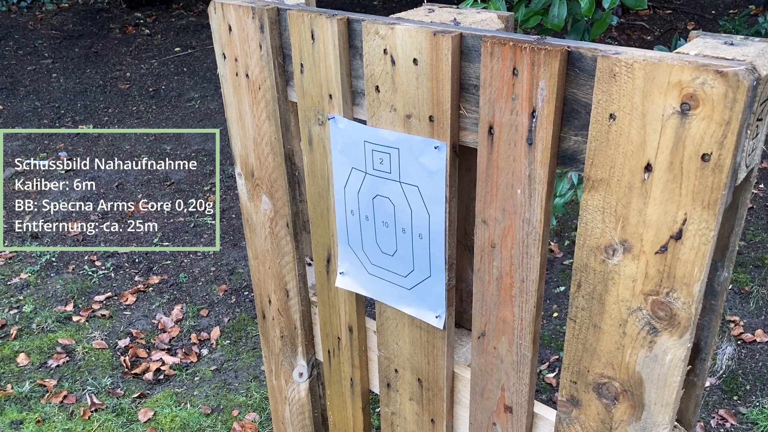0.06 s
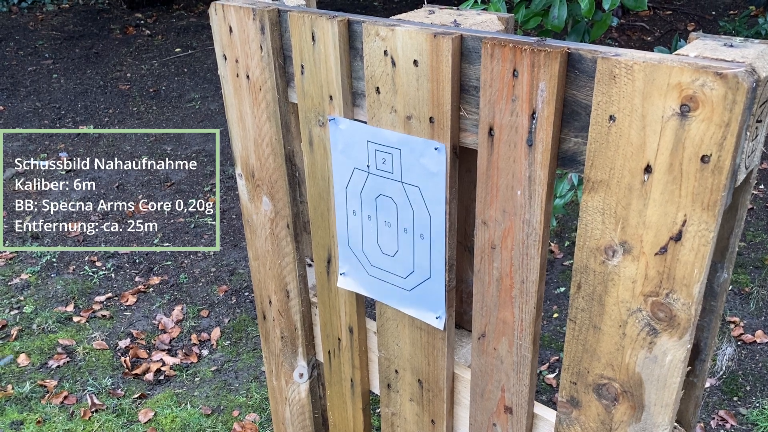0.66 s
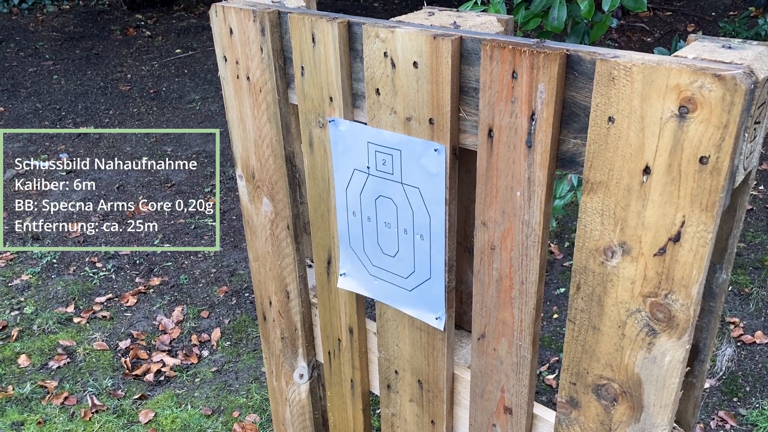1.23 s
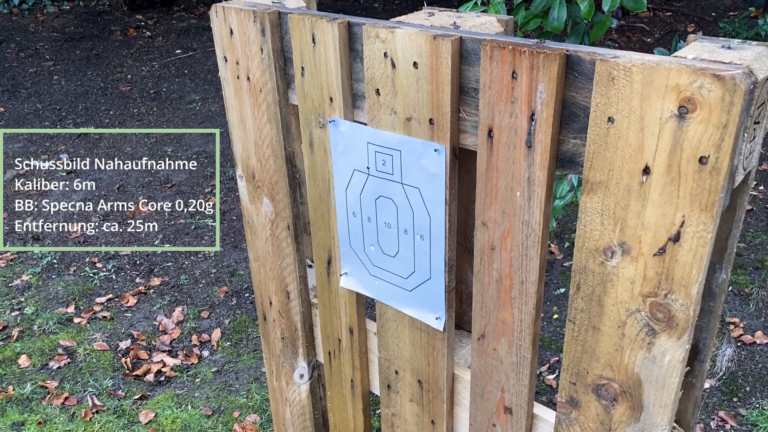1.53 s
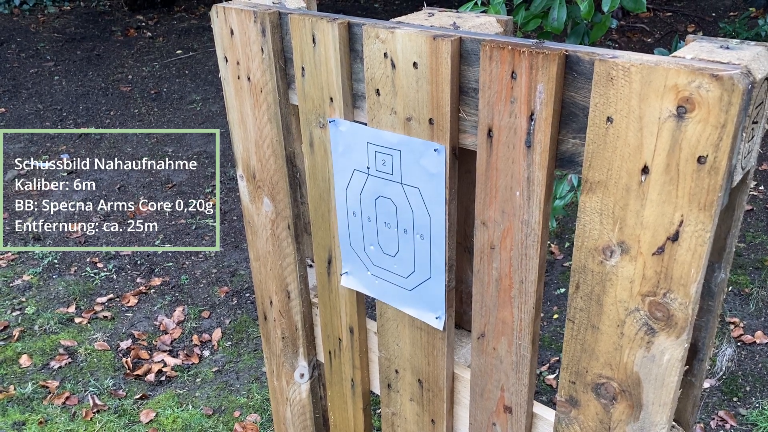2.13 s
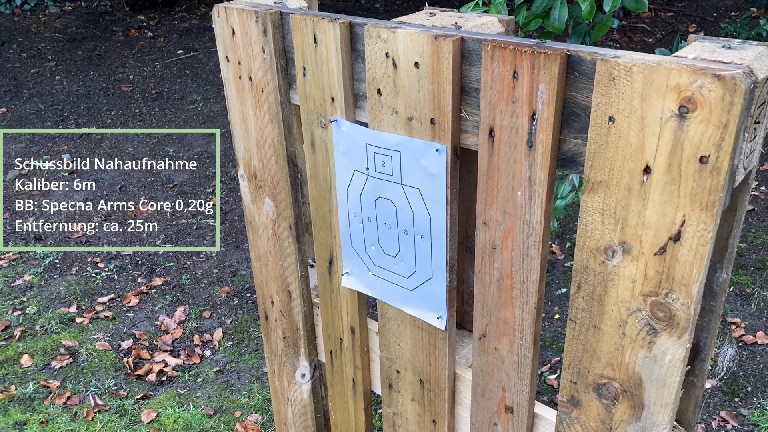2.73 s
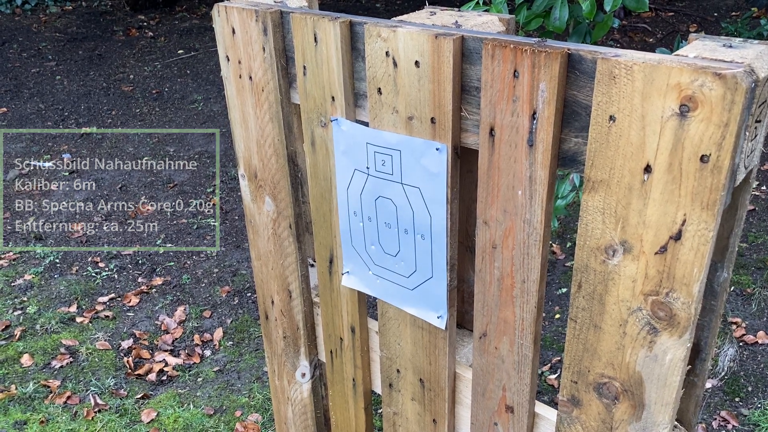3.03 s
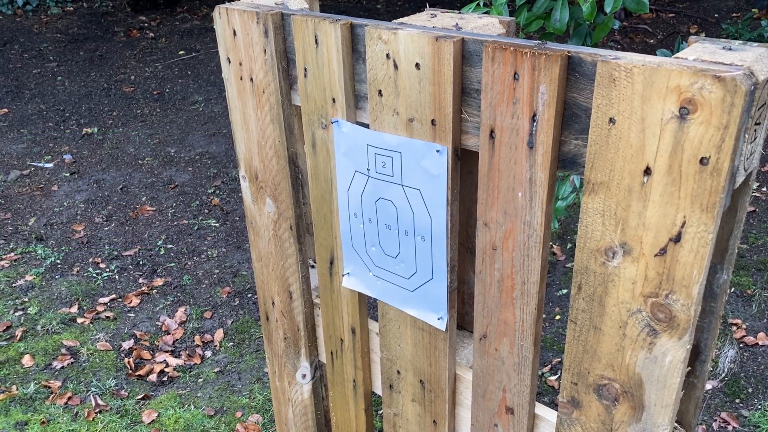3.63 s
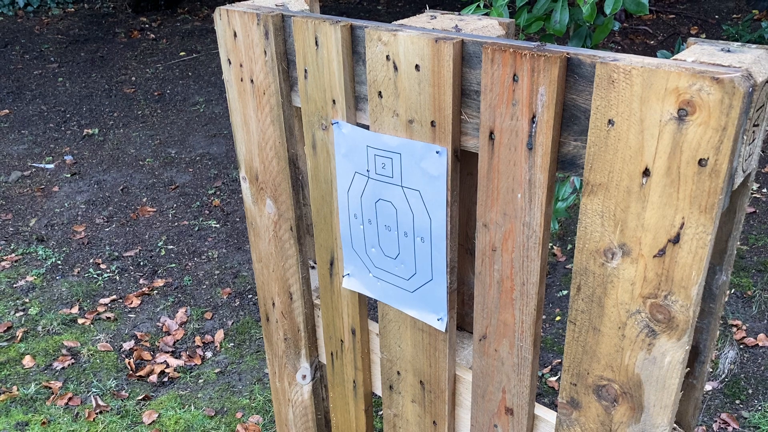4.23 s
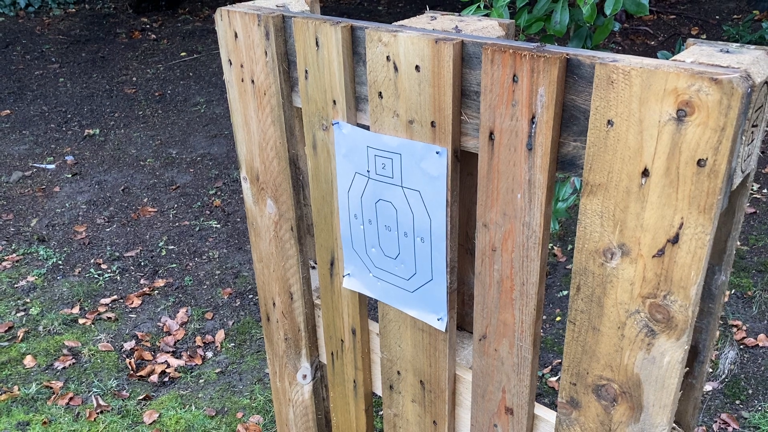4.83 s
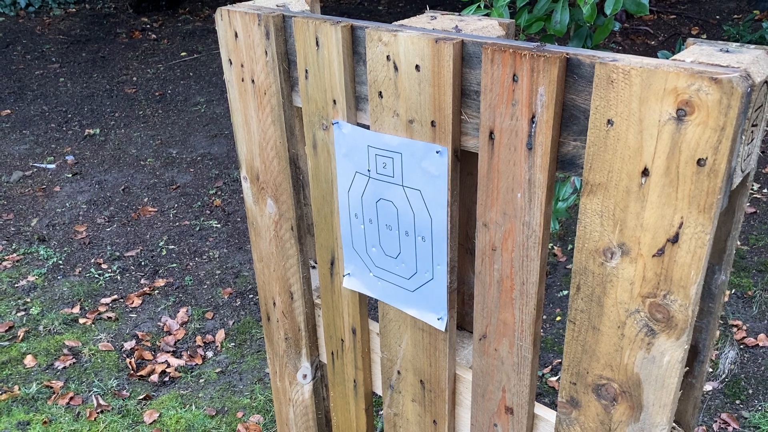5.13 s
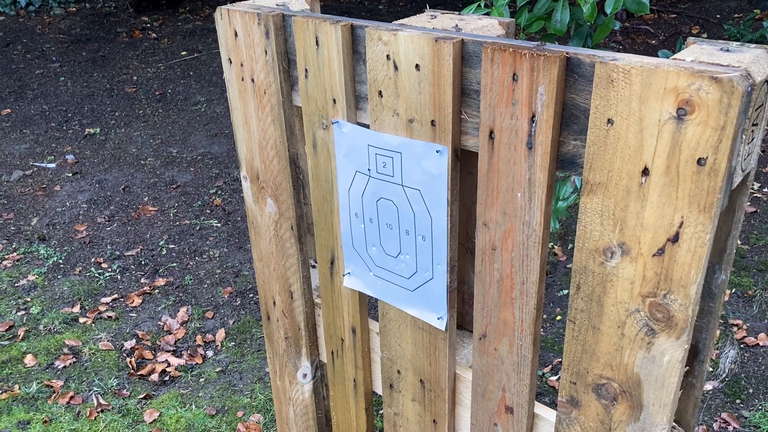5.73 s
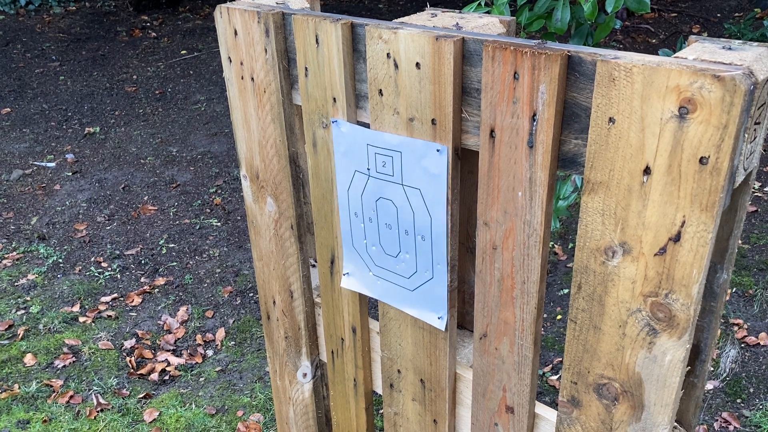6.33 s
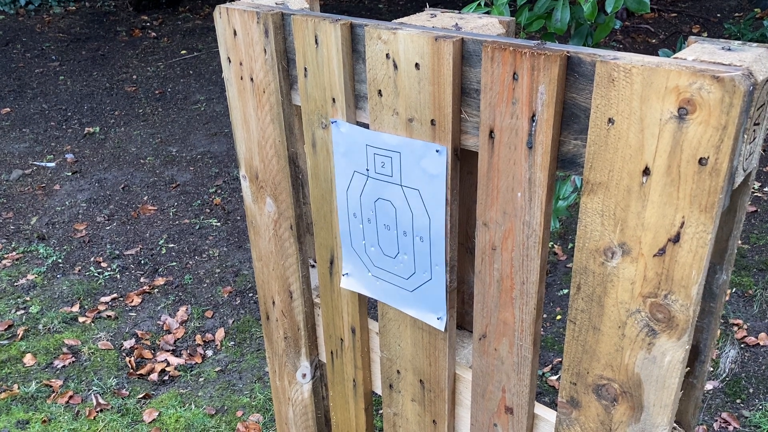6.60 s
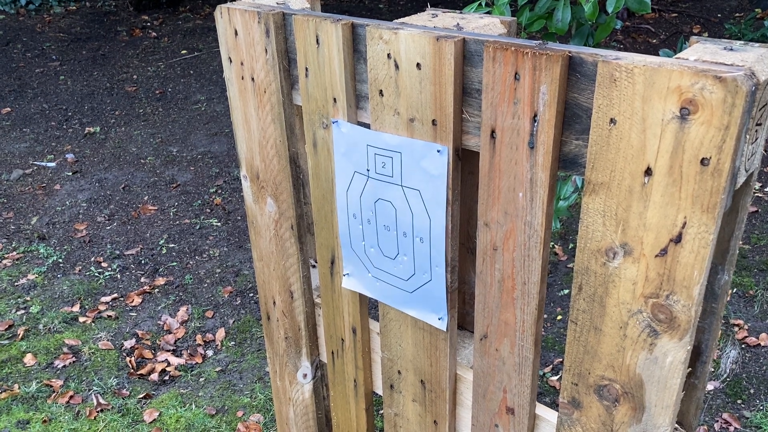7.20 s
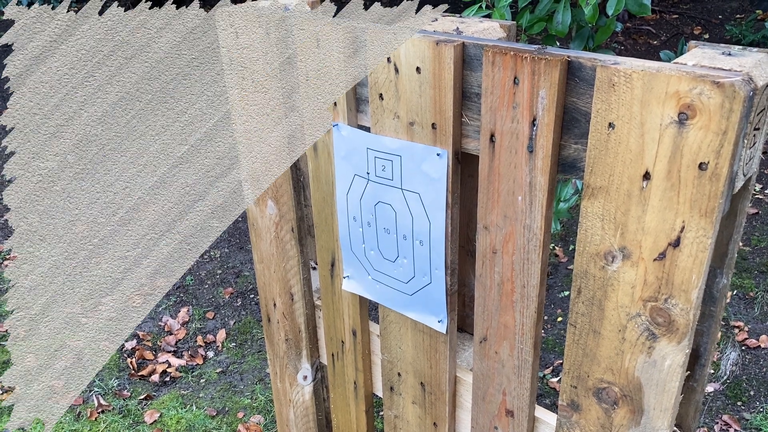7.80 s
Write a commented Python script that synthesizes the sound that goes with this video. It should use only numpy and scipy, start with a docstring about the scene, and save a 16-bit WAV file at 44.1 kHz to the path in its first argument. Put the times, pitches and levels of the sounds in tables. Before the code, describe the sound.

In a garden, the microphone stands beside a paper target on a wooden pallet while an airsoft rifle fires from a distance. Thirteen quick single pellets whizz in and crack through the paper, making the sheet flap and the boards knock, with faint pops from the rifle. After a pause, two short automatic bursts hit the target. A last faint burst misses and rustles into leaves. A low outdoor hum lies underneath.

```python
"""A garden, microphone beside a paper target on a wooden pallet, an electric airsoft rifle 25 m away.
Over a low outdoor hum come thirteen single shots. Each faint report is followed by its pellet, which
whizzes in, cracks through the paper, makes the sheet flap and the boards ring; the garden echoes and
hard hits overload the microphone. A spent pellet ticks on the wood. After a pause two full-auto
bursts strike the target, and a last one misses and rustles into the leaves."""
import sys
import numpy as np
from scipy import signal
from scipy.fft import rfft, irfft
from scipy.io import wavfile
from scipy.ndimage import uniform_filter1d

SR = 44100
rng = np.random.default_rng(int(sys.argv[2]) if len(sys.argv) > 2 else 0)


def file_out(sig):
    """Save sig as 16-bit WAV at sys.argv[1]."""
    # one column per channel
    cols = np.atleast_2d(sig).T
    # limit, then scale
    lim = np.clip(cols, -1, 1)
    pcm = np.round(lim * 32767).astype(np.int16)
    wavfile.write(sys.argv[1], SR, pcm)


N = 355446
T = np.arange(SR * 2 // 3) / SR  # seconds since an event
TEN_MS = SR // 100
PELLET_LAG_S = 0.39  # slower than sound, the pellet arrives this long after its report

# Hits on the target. The spot struck shares out the blow: dullness, thud, ring and flap add to strength.
# start_s, strength_db, dullness_db, thud_db, ring_db, ring_hz, flap_db, flight_db
HITS = [(0.381, -5, -5, -25.5, -10, 997.5, -12.5, -27.5), (0.6503, -12, -1.5, 3, -10, 813, -14, -30.5),
        (0.8723, -9, -7, -1.5, -13, 855, -10, -22.5), (1.0802, -14.5, -9, -15, -18.5, 1101, -8.5, -15.5),
        (1.28, -14.5, -0.5, -4.5, -11.5, 1066, -1.5, -26),
        (1.4858, -13.5, 2, -2.5, -13.5, 1038, -13.5, -26.5),
        (1.6837, -10, -8.5, -17, -18.5, 1430, -38, -28), (1.8855, -11, -6, -16.5, -14, 1357, -27.5, -42.5),
        (2.0978, -12.5, 5, -4, -15, 1540, -32, -35), (2.318, -11.5, 4.5, -3.5, -19, 1459, -34, -33),
        (2.5182, -10, -15, -16.5, -20.5, 1093, -30.5, -34),
        (2.707, -15.5, -0.5, -19, -4.5, 967, -30, -33.5), (2.8778, -10.5, -6, -25.5, -8, 679, -41.5, -32.5),
        (5.0107, -9, -5.5, -21.5, -16.5, 1366, -26.5, -28.5),
        (5.1079, -6.5, -9, -26, -17.5, 1366, -17, -39.5), (5.2033, -7.5, -13, -20, -13.5, 1350, -30, -39.5),
        (5.295, -10, -5, -34, -6, 818, -53, -43.5), (5.3864, -10, -5, -27, -19, 1050, -11, -30.5),
        (5.7688, -10.5, -5.5, -19.5, -24, 1077, -18.5, -29), (5.8671, -15.5, 7, -6, -17, 1532, -31, -37.5),
        (5.96, -12.5, -6, -20, -16.5, 1071, -37, -31.5), (6.0528, -13.5, 2.5, -5.5, -10.5, 814, -31.5, -33),
        (6.1483, -12, -1.5, -7, -14.5, 805, -46, -31), (6.2405, -15.5, -4.5, -20.5, -12.5, 1066, -45, -50)]
# Spectrum of rustling leaves: frequency_hz, level_db
LEAVES = [(500, -15.5), (2000, -4), (5000, 3.5), (10000, -8), (15000, -21)]


def undb(db):
    """Decibels to gain."""
    return 10 ** (np.asarray(db) / 20)


def level(x, db):
    """Give a burst the energy of 10 ms at this level."""
    return x * undb(db) / np.sqrt(np.mean(x ** 2) * x.shape[-1] / TEN_MS)


def fade(t60, delay=0):
    """Exponential decay that starts after a delay."""
    return (T >= delay) * np.exp(-np.log(1000) * np.abs(T - delay) / t60)


def bump(hz, centre_hz, octaves):
    """Bell curve on a log-frequency axis."""
    return np.exp(-.5 * (np.log2(hz / centre_hz) / octaves) ** 2)


def noise(spectrum, spread, gain=lambda hz: 1, size=len(T), wide_hz=1, bass_share=0.25):
    """Stereo noise of rms 1 from (frequency_hz, level_db); spread is side over mid, less below wide_hz."""
    hz = np.maximum(np.fft.rfftfreq(size, 1 / SR), 1)
    f, db = np.transpose(spectrum)
    colour = undb(np.interp(np.log(hz), np.log(f), db))
    mid, side = rfft(rng.standard_normal((2, size))) * gain(hz) * colour
    side = side * spread * np.minimum(bass_share + hz / wide_hz, 1)
    x = irfft(np.array([mid + side, mid - side]), size)
    return x / x.std()


def add(out, start_s, x):
    """Mix a sound in at a time."""
    i = max(int(start_s * SR), 0)
    out[:, i:i + x.shape[-1]] += x[..., :N - i]


def outdoors():
    """The garden's bed: a dull, distant, slightly restless hum."""
    # Spectrum of the hum: frequency_hz, level_db
    spectrum = [(15, -41.5), (25, -14.5), (59, -2.5), (96, -4.5), (124, -13.5), (197, -13.5), (367, -23.5),
                (475, -18.5), (584, -20.5), (631, -10.5), (682, -19.5), (1600, -19), (2820, -36),
                (5820, -37), (12000, -56), (15600, -87), (22000, -120)]
    # Its slow drift: time_s, level_db
    drift = [(0, -46.5), (1.2, -56), (3.5, -59.5), (4.1, -58), (4.4, -55.5), (6.9, -59.5), (7.3, -60.5),
             (8.05, -61.5)]
    t = np.arange(N) / SR
    restless_db = 1.1 * np.interp(t, np.linspace(0, t[-1], 60), rng.standard_normal(60))
    drift_db = np.interp(t, *np.transpose(drift))
    return noise(spectrum, 1.0, size=N, wide_hz=1200) * undb(drift_db + restless_db)


def patchy(step=SR // 400):
    """Scattered sound comes back in clumps, one from each trunk or bush."""
    return undb(2.5 * np.interp(T, T[::step], rng.standard_normal(len(T[::step]))))


def bushes(db, dullness_db, delay_s=0.14, width_s=0.043, size=SR // 3):
    """Bushes further off return a soft, late swell in the colour of the blow."""
    centre_hz = 2700 * 2 ** (-0.17 * dullness_db)
    swell = patchy() * np.exp(-((T - delay_s) / width_s) ** 2)
    return undb(db) * noise(LEAVES, 1.0, lambda f: .1 + bump(f, centre_hz, .5), size=size) * swell[:size]


def garden(db, dullness_db, near_t60=.2, far_t60=1.0, far_db=-19, wall_db=-18, wall_s=0.081):
    """Hedges and trees scatter a blow back as a hiss that dulls as it fades; a wall adds a faint slap."""
    # Spectrum of the nearby scatter: frequency_hz, level_db
    near_spectrum = [(100, -5.5), (300, -5.5), (800, -1), (1600, -1.5), (3000, 2), (6000, 2), (10000, 1),
                     (15000, -9)]
    far_spectrum = [(200, -5.5), (1000, -0.5), (2200, 1.0), (6000, -4.5), (10000, -11.5), (15000, -21)]
    blow_colour = lambda f: undb(1.2 * (dullness_db + 2.5) * bump(f, 1900, 0.88))
    near = noise(near_spectrum, 0.23, blow_colour) * fade(near_t60)
    far = noise(far_spectrum, 1.0) * fade(far_t60)
    scatter = (near + undb(far_db) * far) * (1 - fade(0.036)) * patchy()
    wall = noise([(600, -28), (2000, 2.0), (4500, -2.5), (9000, -14.5)], .3) * fade(0.023, wall_s)
    return level(scatter, db) + level(wall, db + wall_db + .5 * dullness_db)


def missed_shots(start_s=6.368, rounds=5, cycle_s=0.094):
    """Report times of the last burst, which goes past the target at the rifle's steady rate."""
    return start_s + cycle_s * np.arange(rounds)


def rifle(boost_db=3, tail_t60=0.69, snap=.9):
    """One report ahead of every pellet; at 25 m the piston's pop arrives mostly as scattered sound."""
    # Spectrum of a report: frequency_hz, level_db
    spectrum = [(25, -4), (60, 10), (100, 16), (180, 4), (350, 1.5), (700, 1), (1800, -1), (3000, -4),
                (6000, -5.5), (10000, -10.5), (15000, -24)]
    # Loudness of the reports: time_s, level_db, fullness_db (bass and treble against the midrange)
    loudness = [(0, -33.5, 0.5), (0.3, -30.5, 0), (0.5, -34, 2), (0.7, -41.5, 0.5), (2.0, -44.5, -1.5),
                (4.7, -39, 1), (5.7, -40, 0), (6.4, -43, -6.5)]
    times, levels, fullness = np.transpose(loudness)
    out = np.zeros((2, N))
    for start_s in [hit[0] - PELLET_LAG_S for hit in HITS] + list(missed_shots()):
        db, full_db = np.interp(start_s, times, levels), np.interp(start_s, times, fullness)
        colour = lambda f: undb((full_db + 2.0) * np.minimum(0.55 * np.abs(np.log2(f / 900)), 1.6))
        pop = noise(spectrum, 0.81, colour, wide_hz=900) * patchy()
        shape = fade(tail_t60) + snap * fade(0.012) + .5 * fade(.04, 0.0066)
        add(out, start_s, level(pop * shape, db + boost_db))
    return out


def spent_pellets(miss_db=-56, miss_hz=5600, rustle_db=-53, rustle_t60=0.18):
    """Small plastic ticks: one stray on the wood, and each missed pellet as it rustles into the leaves."""
    # A spent pellet drops on the wood: start_s, level_db, pitch_hz
    stray_tick = (3.092, -40, 6400)
    plastic = [(200, 8.5), (3000, 3), (8000, -10), (15000, -2.0)]
    out = np.zeros((2, N))
    landings = missed_shots() + PELLET_LAG_S
    for start_s, db, hz in [stray_tick] + [(s, miss_db, miss_hz) for s in landings]:
        tick = noise(plastic, 0.26, lambda f: 1 + 2 * bump(f, hz, 0.68))
        add(out, start_s, level(tick * (fade(0.024) + 0.074 * fade(0.15)), db))
    for start_s in landings:
        rustle = noise(LEAVES, 1.0, lambda f: .1 + bump(f, miss_hz, 0.6)) * patchy()
        add(out, start_s, level(rustle * fade(rustle_t60), rustle_db))
    return out


def whizz(hz, db, t60=0.07, strays_db=-16, octaves=0.022):
    """Vortices shed by the pellet whistle on one main pitch and a few stray ones."""
    stray_hz = rng.uniform(1500, 8000, 7)
    lines = lambda f: bump(f, hz, octaves) + undb(strays_db) * sum(bump(f, h, octaves) for h in stray_hz)
    tone = noise([(500, -6), (2500, 6.0), (7500, -0.5), (9500, -10)], 0.67, lines)
    return level(tone * fade(t60) / (1 + (T / .014) ** 6), db)


def approach(rush_db, whistle_db, hz, rush_t60=0.023):
    """The pellet's wake swells as it closes on the microphone, over the last 50 ms before impact."""
    spectrum = [(300, -14), (1500, -5), (3000, 0), (7500, 1), (9000, -12), (15000, -24)]
    rush = noise(spectrum, .5) * fade(rush_t60)
    wake = level(rush, min(rush_db, -21) - 2) + whizz(hz, whistle_db)
    return wake[:, :SR // 20][:, ::-1]  # reversed, the decay becomes a swell


def ringing(modes, db, favour=lambda f: 0, scatter_db=1.0):
    """Damped modes; every blow lands elsewhere and so weights and tunes them a little differently."""
    hz, mode_db, t60 = np.transpose(modes)
    weight, detune, turn = rng.standard_normal((3, len(hz)))
    t = T[:SR // 3]
    phase = 2 * np.pi * (np.outer(hz * (1 + 0.02 * detune), t) + turn[:, None])
    waves = np.sin(phase) * np.exp(-np.log(1000) * t / t60[:, None])
    gains = undb(mode_db + scatter_db * weight + favour(hz))
    attack = 1 - np.exp(-t / 0.0023)
    return level(gains @ waves * attack, db)


def boards(hz, db, focus_db=11, focus_octaves=0.13, body_db=-7):
    """The spot that is hit favours the modes near one pitch; a dense, damped body lies under them."""
    # Modes of the single boards: pitch_hz, level_db, t60_s
    modes = [(690, -12, 0.056), (818.7, -1, 0.06), (883, -8.5, .06), (1079, -5, 0.051), (1289, -0.5, 0.03),
             (1510, 0, 0.064), (1561, -3, 0.028), (1707, -6, 0.075), (2500, -13.5, 0.095)]
    body = noise([(300, -28.0), (700, -1), (1600, 0.5), (2600, -19.0), (6000, -35.5)], .3)
    body *= fade(0.079) - fade(0.002)
    ring = ringing(modes, db, lambda f: focus_db * bump(f, hz, focus_octaves))
    return ring + level(body[:, :SR // 3], db + body_db)


def pallet(db):
    """The whole pallet booms under the blow."""
    # Its low modes: pitch_hz, level_db, t60_s
    modes = [(252, -8, 0.22), (303, -0.5, 0.18), (350, -6, 0.11), (458, -1, 0.15)]
    return ringing(modes, db, scatter_db=3)


def knock(db, t60=0.028, delay=.0012):
    """The gap behind the sheet answers a square hit with a hollow knock."""
    spectrum = [(150, -22.5), (350, -3.5), (550, 0.5), (800, 1.5), (1500, -19.5), (4000, -41.5)]
    return level(noise(spectrum, 0.073) * fade(t60, delay), db)


def sway(db, hz=51.5, delay_s=0.11, width_s=0.075):
    """A sheet that has flapped swings on at a low pitch, swelling and dying away."""
    swell = np.exp(-((T - delay_s) / width_s) ** 2)
    return undb(db) * np.sqrt(2) * swell * np.sin(2 * np.pi * hz * T)


def bending_wave(db, t60, cycles, lowest_hz, delay, onset_s=0.00019):
    """Short bending waves cross the sheet first and long ones last, so the pitch falls as 1 / time."""
    age = np.maximum(T - delay, 0)
    phase = 2 * np.pi * (lowest_hz * age + cycles * np.log1p(age / onset_s))
    return level(np.sin(phase) * fade(t60, delay), db)


def clack(db, bounce_s=0.0033, bounce=0.78):
    """Dry midrange of the blow on paper and wood."""
    # Spectrum of the clack: frequency_hz, level_db
    spectrum = [(400, -32), (750, 0.5), (1400, -1.5), (2000, -1.5), (2800, -5), (4000, -6.5), (8000, -29.5)]
    shape = fade(0.026) - fade(0.0015) + bounce * fade(0.009, bounce_s)
    return level(noise(spectrum, 0.57) * shape, db)


def crack(db, dullness_db, bounce_s=.0047, bounce=0.08, rattle=0.036, snap=1.2):
    """The paper bursts with a snap that comes again off the ground and rattles between the boards."""
    # Spectrum of tearing paper: frequency_hz, level_db
    spectrum = [(1500, -29), (3000, -2), (4000, 4.5), (7000, 2), (10000, 1.5), (13000, -12.5),
                (16000, -20.5)]
    centre_hz = 4408 * 2 ** (-0.55 * dullness_db)  # a duller blow cracks lower
    shape = fade(.012) + bounce * fade(.012, bounce_s) + rattle * fade(.05)
    tear = noise(spectrum, 0.48, lambda f: 1 + 2.4 * bump(f, centre_hz, 0.22)) * shape
    tick = noise([(3000, -14.5), (7000, 4.5), (10000, 0.5), (16000, -6)], 0.069)
    tick *= fade(.004) + 0.3 * fade(0.0078, bounce_s)
    return level(tear + snap * tick, db)


def pellets(whistle_hz=7550, whistle_spread=0.03, pan_spread_db=1.3):
    """Every hit, close up: approach, crack, clack, the sheet's thud and flap, ringing wood, the echo."""
    out = np.zeros((2, N))
    chance = rng.standard_normal((len(HITS), 2))
    for (start_s, strength, dullness, thud, ring, ring_hz, flap, flight), (speed, side) in zip(HITS, chance):
        blow = crack(strength + 2.5, dullness) + clack(strength + dullness)
        blow_db = 10 * np.log10(np.mean(blow ** 2) * SR / TEN_MS)
        echo_db = blow_db - 17 + 0.3 * dullness + 0.2 * ring  # dull blows and blows on wood carry better
        pitch_hz = whistle_hz * (1 + whistle_spread * speed)  # nearly one speed, so nearly one pitch
        pan = undb(pan_spread_db * np.array([[side], [-side]]) / 2)
        add(out, start_s - 0.05, approach(flight + 10, flight + 2, pitch_hz))
        for part in (blow * pan,
                     bending_wave(strength + thud, t60=.02, cycles=.9, lowest_hz=61.3, delay=.0012),
                     bending_wave(strength + flap + 1, t60=.11, cycles=.6, lowest_hz=35.18, delay=.0015),
                     sway(strength + flap - 26),
                     knock(strength + thud - 1.5),
                     boards(ring_hz, strength + ring + 5),
                     pallet(strength + 0.25 * ring - 23.5),
                     garden(echo_db, dullness),
                     bushes(echo_db - 25.5, dullness)):
            add(out, start_s, part)
    return out


def scene(leaves_db=-61):
    """Target, rifle and garden together, over a fine hiss of leaves."""
    shooting = pellets() + rifle() + spent_pellets()
    return shooting + outdoors() + undb(leaves_db) * noise(LEAVES, 0.62, size=N)


def suppressor(x, split_hz=2200, open_db=-56, depth_db=30, slope=5):
    """Noise suppression: the treble is turned down whenever little of it is around."""
    hz = np.fft.rfftfreq(N, 1 / SR)
    treble = x - irfft(rfft(x) / (1 + (hz / split_hz) ** 12), N)
    power = uniform_filter1d(np.mean(treble ** 2, axis=0), SR // 10)
    cut_db = np.clip(slope * (10 * np.log10(power + 1e-12) - open_db), -depth_db, 0)
    return x + treble * (undb(uniform_filter1d(cut_db, SR // 8)) - 1)


def record(dry, ceiling=1.2, top_hz=15700):
    """Two microphone ports hear the treble out of step; hiss is suppressed, hits clip, the top is cut."""
    # How much more the left port hears: frequency_hz, balance_db
    balance = [(100, -0.5), (300, 0.5), (600, 0), (1100, -1.5), (2200, -0.6), (4500, 3.5), (9000, 0),
               (14000, 1)]
    # Phase by which the left port leads: frequency_hz, phase_rad
    lead = [(1000, 0), (3000, .8), (5500, 1.1), (6800, 0), (8400, -3.1), (10000, -6.3), (12000, -9.4),
            (14000, -12.6), (16000, -15.8)]
    hz = np.fft.rfftfreq(2 * N, 1 / SR)
    lean = undb(np.interp(hz, *np.transpose(balance)) / 2)
    ports = np.array([lean * np.exp(1j * np.interp(hz, *np.transpose(lead))), 1 / lean])
    picked_up = irfft(rfft(dry, 2 * N) * ports)[:, :N]
    drive = suppressor(picked_up) / ceiling
    clipped = ceiling * drive / (1 + drive ** 8) ** (1 / 8)
    return signal.sosfilt(signal.ellip(8, .2, 70, top_hz, fs=SR, output="sos"), clipped)


dry = scene()
out = record(dry)
file_out(out)
```